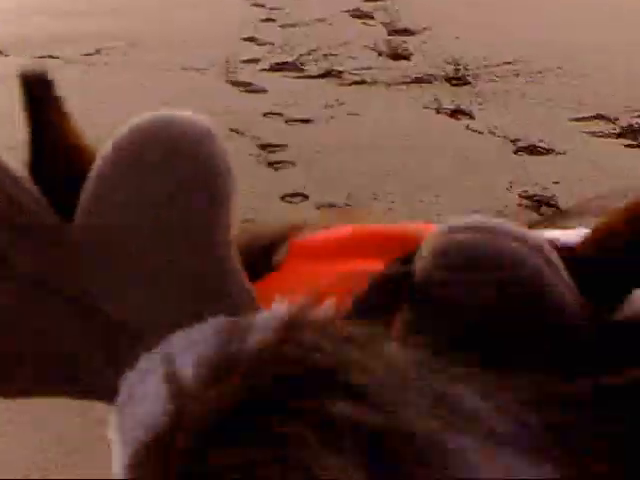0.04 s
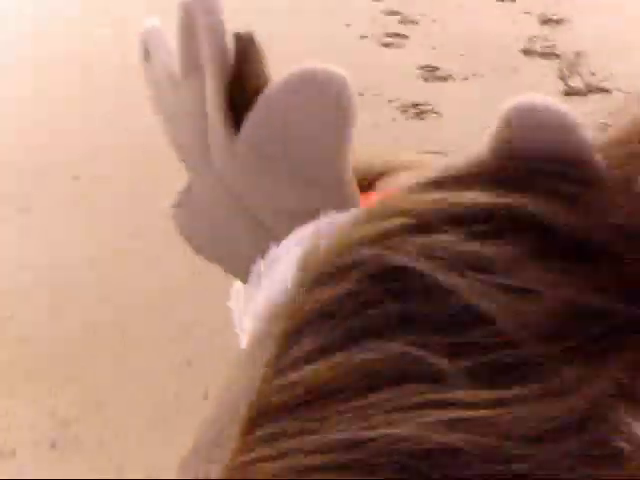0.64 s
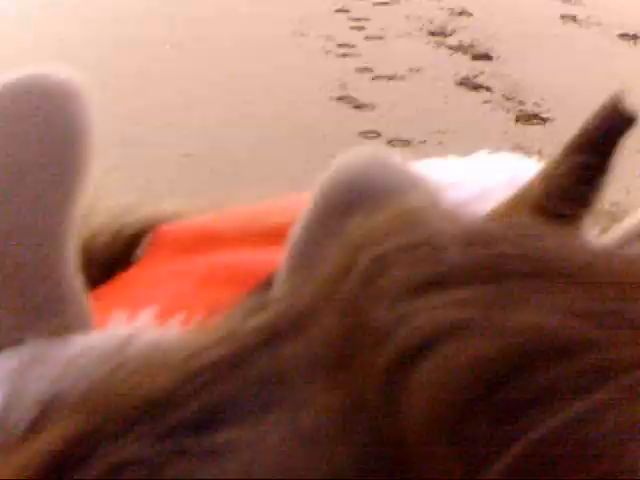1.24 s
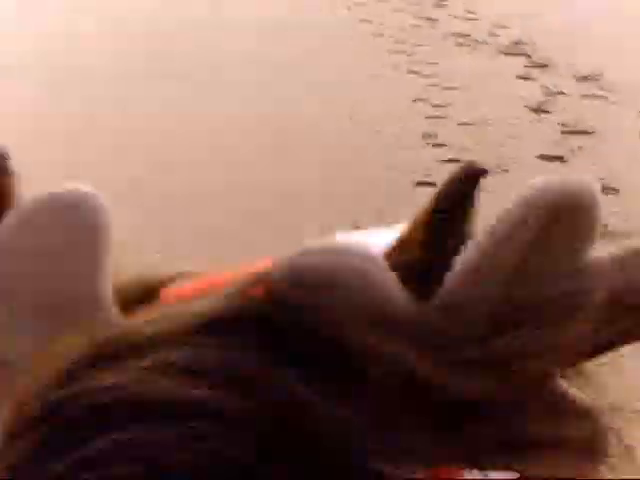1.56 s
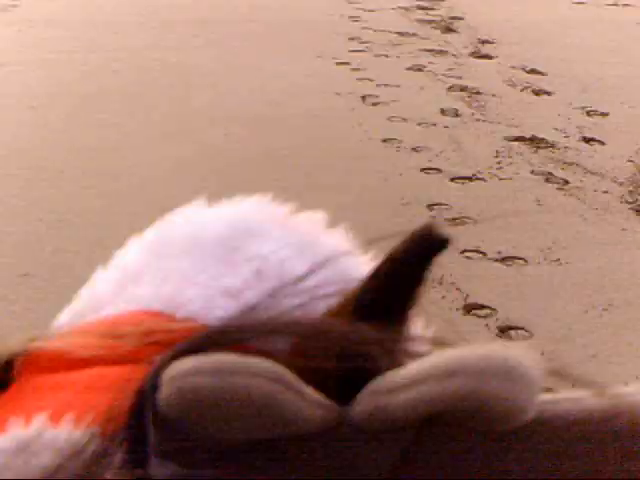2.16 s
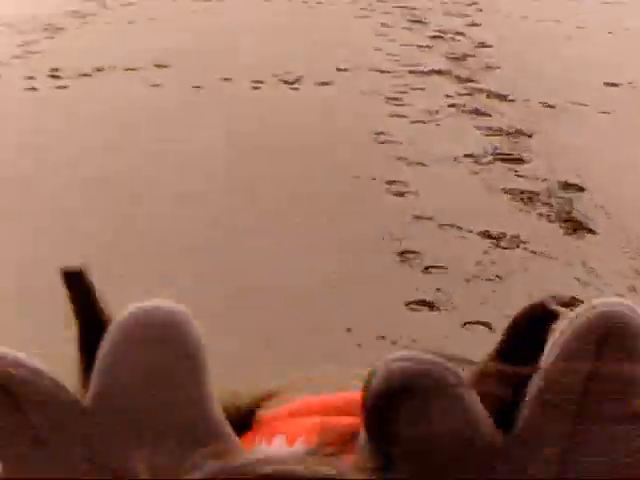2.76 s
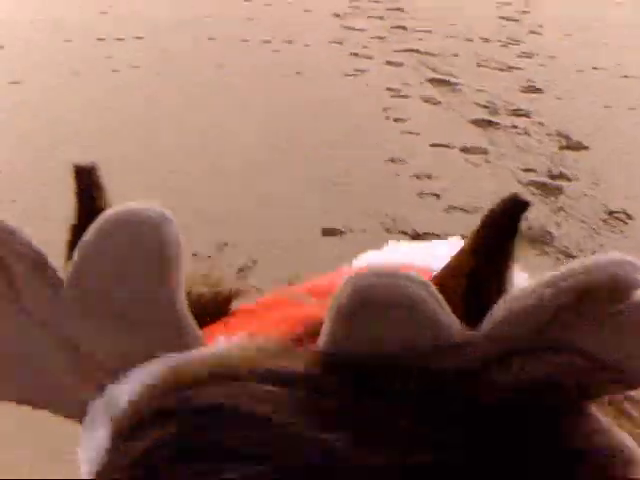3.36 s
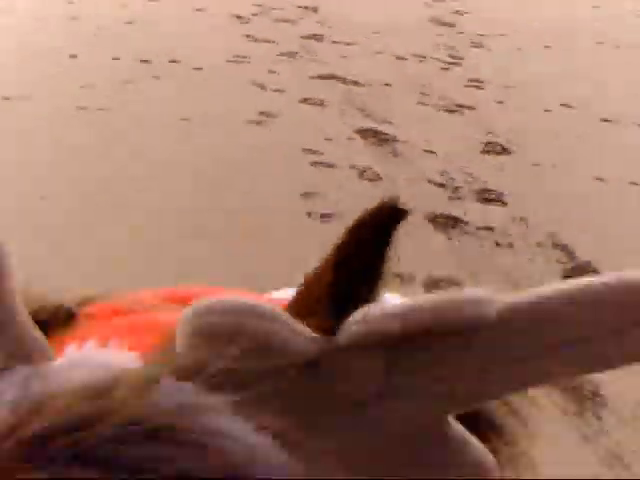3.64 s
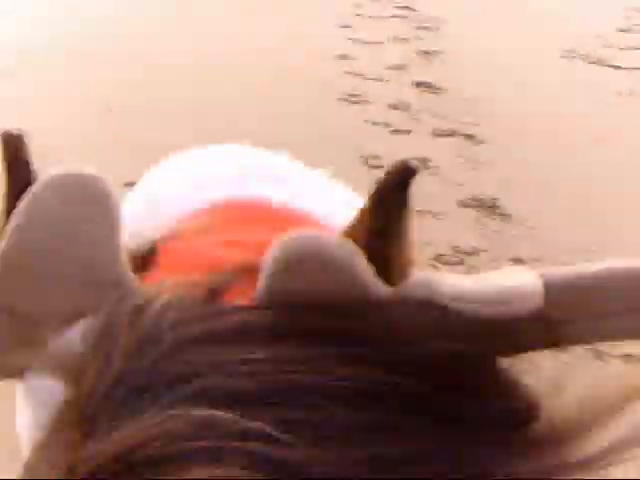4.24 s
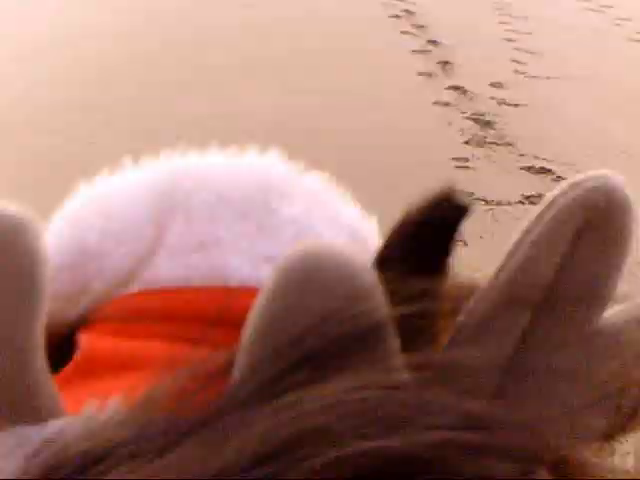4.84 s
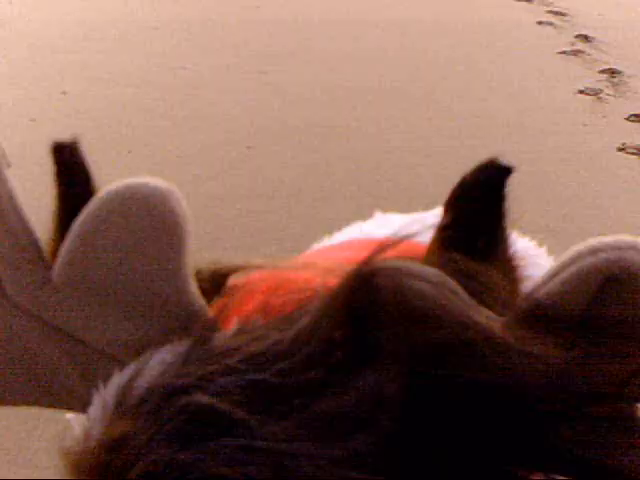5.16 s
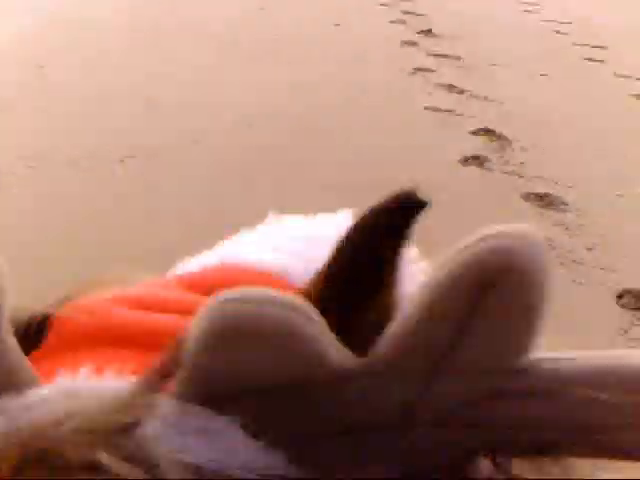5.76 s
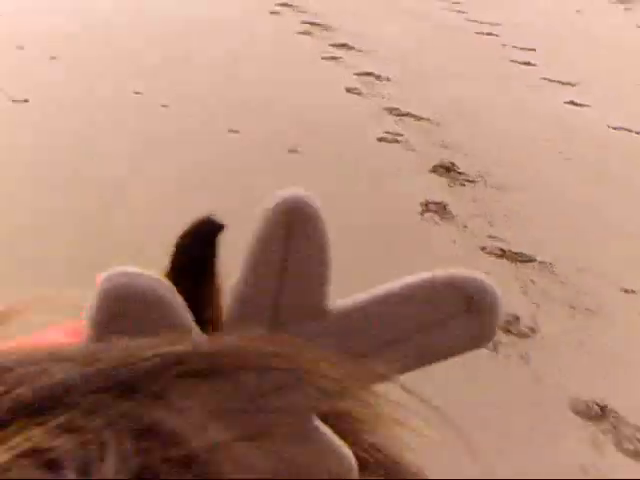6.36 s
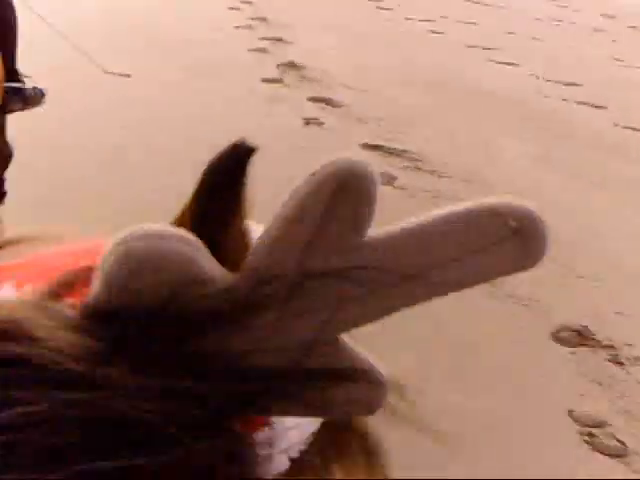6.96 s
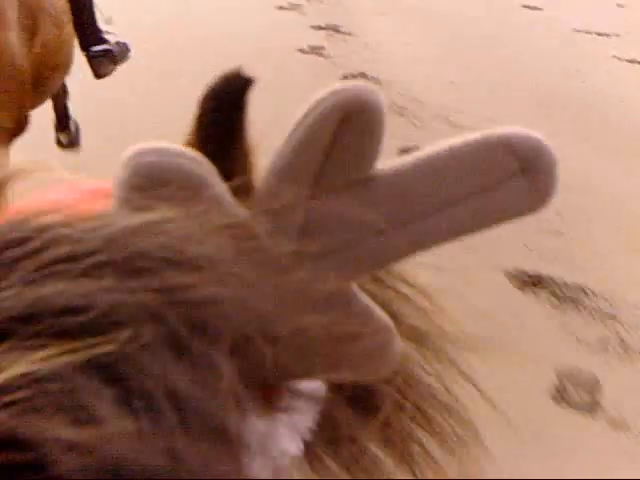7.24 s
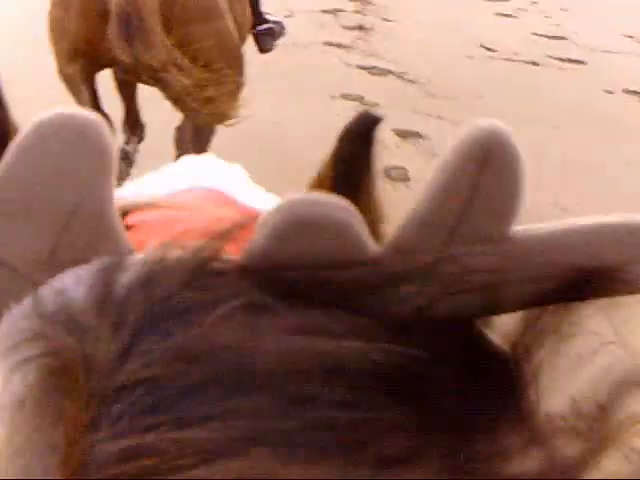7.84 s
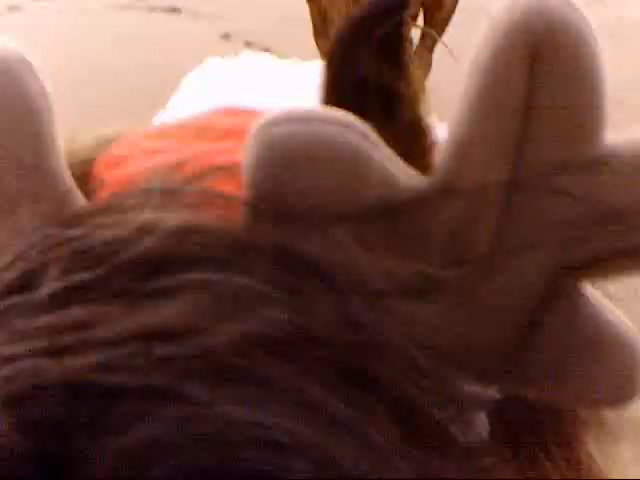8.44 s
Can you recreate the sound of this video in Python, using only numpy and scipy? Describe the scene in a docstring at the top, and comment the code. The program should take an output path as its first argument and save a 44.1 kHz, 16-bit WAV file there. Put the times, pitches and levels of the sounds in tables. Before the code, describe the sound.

Heavy wind buffets the microphone in surges with a horse's stride, almost covering the dull hoofbeats of a beach gallop.

```python
"""Beach gallop on a helmet camera

Wind buffets the camera: eddies of every size roll over the microphone port, surging with the
horse's stride and tearing into short, rasping gusts. Underneath, hooves thud faintly in wet sand,
cloth scuffs, a buckle ticks, and the camera's electronics whine once per picture."""
import sys
import numpy as np
from scipy import signal
from scipy.fft import rfft, irfft, next_fast_len
from scipy.io import wavfile
from scipy.ndimage import uniform_filter1d

SR = 44100
rng = np.random.default_rng(int(sys.argv[2]) if len(sys.argv) > 2 else 0)


def put_to_file(sound):
    """Save the sound as 16-bit audio at rate SR, in the file named by the first command-line argument."""
    columns = np.atleast_2d(sound).T  # one column per channel
    safe = np.clip(columns, -1, 1)
    whole_steps = np.round(safe * 32767)
    wavfile.write(sys.argv[1], SR, whole_steps.astype(np.int16))


N = 379260
TIME = np.arange(N) / SR


# tone of the wind through port and housing: f/Hz, level/dB
PORT_COLOUR = [(8, 9), (25, 0), (55, -5.5), (100, -5.5), (200, -9), (420, -19.5), (700, -24.5),
               (1050, -25.5), (1400, -37), (2300, -36.5), (2800, -52), (3500, -50.5), (4500, -64),
               (9000, -67)]
# slow ride of the deep rumble: t/s, level/dB
RUMBLE_RIDE = [(0.04, 1), (0.24, 0), (1.38, 1), (1.56, -2), (2.05, -4.5), (2.3, -2), (3.43, 1.5),
               (3.98, -2), (4.38, -0.5), (5.11, -1), (6.1, -0.5), (7.19, 0.5), (8.08, -5.5), (8.59, 1.5)]
# eddy sizes, large to small: f/Hz, level/dB, airflow tracking/(dB/dB), rumble tracking/(dB/dB)
EDDY_SIZES = [(40, -2, 0.19, 1.15), (180, -3.5, 0.98, .72), (690, -1.5, 0.9, 0), (1920, -4, 1.35, 0)]

def wind(flow_db, flutter, flutter_db=3.5, puff_db=2.23):
    """The main bed: bands of turbulence ride the nearest eddy sizes, and the small eddies flutter."""
    rumble_db = in_time(RUMBLE_RIDE)[0]
    waver_db = 0.25 * drift(12)
    rides_db = np.array([db + by_flow * flow_db + by_rumble * rumble_db + waver_db
                         for _, db, by_flow, by_rumble in EDDY_SIZES])
    eddy_octaves = np.log2([row[0] for row in EDDY_SIZES])
    size = next_fast_len(N)
    air_spectrum = rfft(from_db(-25.5) * coloured(PORT_COLOUR), size)
    octaves = np.log2(np.arange(size // 2 + 1) * SR / size + 1e-3)
    centres = np.log2([8, 25, 60, 120, 220, 400, 700, 1100, 1700, 2600, 4500])
    out = np.zeros(N)
    for centre, solo in zip(centres, np.eye(len(centres))):
        eddies = irfft(air_spectrum * np.interp(octaves, centres, solo), size)[:N]
        steady = np.std(eddies) * evened(eddies, 0.0426 + 3 / 2 ** centre)
        nearness = np.array([np.interp(centre, eddy_octaves, row) for row in np.eye(len(EDDY_SIZES))])
        smallness = np.clip((centre - np.log2(60)) / 4, 0, 1)
        puffs = rms_one(from_db(flutter_db * smallness * flutter + puff_db * drift(32.5)))
        out += steady * puffs * from_db(nearness @ rides_db)
    return band(out, 1.1, 17000, order=1)


# slow ride of the air over the port: t/s, level/dB
FLOW_RIDE = [(0.0, 0), (0.76, -3), (1.2, 0.5), (1.85, 3), (3.1, 0.5), (3.74, -8.5), (4.82, -5), (5.5, -2.5),
             (6.03, 1), (6.51, -3), (7.34, 0.5), (8.09, -8), (8.6, -4)]
# the head swings into the wind, about once a stride: t/s, boost/dB, length/s
STRIDE_SURGES = [(0.27, 7.5, 0.23), (0.74, 10.5, 0.32), (1.1, 2.5, 0.23), (1.7, 4, 0.1), (1.93, 4.5, 0.036),
                 (2.28, 2.5, 0.1), (2.63, 5, 0.05), (2.95, 2.5, 0.16), (3.46, 4, 0.14), (3.96, 4, 0.3),
                 (4.35, 9.5, 0.12), (4.54, 7, 0.054), (4.94, 5, 0.07), (5.32, 2.5, 0.17), (5.74, 6, 0.31),
                 (6.14, 5.5, 0.12), (6.55, 8, 0.22), (6.86, 5.5, 0.025), (7.35, 4.5, 0.037),
                 (7.54, 4, 0.068), (7.89, 5, 0.059)]
# the port is briefly sheltered: t/s, dip/dB, length/s
LULLS = [(0.47, -3.5, 0.043), (0.98, -4, 0.028), (1.25, -1, 0.042), (1.44, -5.5, 0.064), (3.19, -4, 0.049),
         (3.34, -6.5, 0.051), (3.63, -10.5, 0.037), (4.16, -4.5, 0.17), (4.43, -3, 0.041),
         (4.8, -3.5, 0.053), (5.9, -6.5, 0.052), (5.99, -6, 0.046), (6.34, -11, 0.085), (6.74, -9.5, 0.13),
         (7.21, -12.5, 0.21)]

def airflow():
    """Strength of the air at the port in dB: a slow ride with flat-topped surges and lulls."""
    return in_time(FLOW_RIDE)[0] + swells(STRIDE_SURGES, order=4) + swells(LULLS, order=4)


# sudden tears of wind: t/s, level/dB, length/s
GUSTS = [(0.228, -23.5, 0.039), (0.274, -19.5, 0.024), (0.323, -24, 0.018), (0.39, -17.5, 0.034),
         (0.585, -21, 0.085), (0.815, -18, 0.046), (0.913, -18, 0.018), (0.943, -19.5, 0.015),
         (1.036, -17, 0.012), (1.292, -13.5, 0.038), (1.333, -18, 0.017), (2.236, -23, 0.033),
         (2.686, -16, 0.036), (3.071, -15.5, 0.027), (3.224, -35, 0.033), (3.406, -19.5, 0.02),
         (3.54, -22.5, 0.088), (4.247, -25.5, 0.054), (4.471, -25, 0.023), (4.858, -18, 0.027),
         (4.95, -22, 0.02), (5.295, -19.5, 0.037), (5.839, -19.5, 0.025), (7.317, -23, 0.019),
         (7.542, -15, 0.036)]

def gusts():
    """The flow breaks away for an instant and rasps over the port."""
    rasp = rms_one(band(coloured(PORT_COLOUR), 196, 5500))
    return from_db(-12) * rasp * bursts(GUSTS, rise_s=0.0012)


# heavy thumps of air: t/s, level/dB, length/s
BUFFETS = [(0.123, -23.5, 0.093), (0.167, -33, 0.072), (0.867, -28, 0.056), (1.277, -21, 0.11),
           (1.33, -27, 0.05), (1.841, -19.5, 0.08), (2.217, -22, 0.082), (2.465, -18.5, 0.048),
           (2.643, -24, 0.048), (2.823, -39, 0.033), (2.954, -27, 0.069), (3.072, -24, 0.078),
           (3.212, -24.5, 0.072), (3.533, -27, 0.05), (4.235, -33, 0.056), (4.461, -28.5, 0.059),
           (4.62, -37, 0.15), (4.915, -33, 0.068), (5.713, -27.5, 0.17), (5.918, -23, 0.087),
           (6.026, -36, 0.016), (6.57, -21, 0.046), (7.31, -25, 0.027), (7.881, -28.5, 0.1)]

def buffets():
    """A big eddy hits the housing: a few low, irregular swings of pressure."""
    thump = evened(band(rng.standard_normal(N), 87, 249), 0.015)
    return from_db(-7) * thump * bursts(BUFFETS, rise_s=0.0025)


# sub-bass swells: t/s, level/dB, length/s
HEAVES = [(.15, -30, 0.051), (.27, -24.5, 0.092), (.91, -28, 0.18), (1.07, -26, 0.1), (1.45, -26, 0.093),
          (2.22, -28, .07), (2.46, -28, 0.19), (2.67, -25, 0.095), (2.84, -27, 0.059), (2.96, -28, 0.1),
          (3.21, -27.5, 0.044), (3.44, -31, 0.077), (3.6, -29.5, 0.12), (4.24, -26, 0.057),
          (4.47, -34, .07), (4.64, -28.5, 0.088), (5.35, -29, 0.067), (5.47, -30, 0.084),
          (5.69, -31, 0.061), (5.93, -27, .07), (6.03, -28, 0.065), (6.55, -24, 0.079), (7.16, -30, 0.28),
          (7.54, -31, 0.12), (7.89, -27.5, 0.083), (8.26, -38, 0.16), (8.45, -28, 0.11)]

def heaves():
    """The largest eddies press slowly on the port and let go."""
    sub = evened(band(rng.standard_normal(N), 14, 65), 0.066)
    return from_db(-1) * sub * flares(HEAVES)


# stretches of low, throaty flutter: t/s, level/dB, length/s
THROBS = [(0.16, -32.5, 0.82), (0.93, -28, 0.16), (1.42, -29.5, 0.18), (1.8, -32, 0.19), (2.27, -30.5, .12),
          (4.35, -35.5, .08), (6.82, -34, 0.15), (7.03, -33, 0.13)]

def throb():
    """Air streams across the housing and vortices peel off at a roughly even rate."""
    return flares(THROBS) * evened(band(rng.standard_normal(N), 75, 150), 0.31)


def sputter(flow_db, per_s=170, cycles=5, spread_db=4.5):
    """Tight vortices burst in the port as blips of a few cycles, much harder in a strong flow."""
    onsets = rng.random(N) < per_s / SR
    strength = from_db(-46.5 + 2.07 * flow_db)
    accents = from_db(spread_db * np.minimum(rng.exponential(1, N), 2))
    pushes = onsets * strength * accents * rng.choice([-1, 1], N)
    pitches_hz = np.geomspace(950, 2300, 6)
    pitch_index = rng.integers(0, len(pitches_hz), N)
    blips = sum(ring(pushes * (pitch_index == k), hz, cycles / hz) for k, hz in enumerate(pitches_hz))
    return band(blips, 300, 2090)


# hard clicks of air: t/s, level/dB
SNAPS = [(0.1211, -33.5), (0.324, -40), (0.395, -38), (0.5855, -47), (0.885, -41), (0.913, -33),
         (0.943, -41), (1.0096, -35), (1.286, -26), (1.3, -29), (1.335, -34), (2.008, -37), (2.2363, -29),
         (2.2782, -24), (2.6309, -25), (2.69, -24.5), (2.879, -29), (3.003, -30), (3.225, -35),
         (3.404, -38), (4.313, -46), (5.3504, -34), (5.714, -35), (5.7803, -21), (7.4634, -35)]

def snaps(gain_db=4, corner_hz=1300):
    """The hardest vortices snap on the edge of the port as single pulses."""
    pulses = np.zeros(N)
    for s, db in SNAPS:
        pulses[int(s * SR)] = from_db(db + gain_db) * rng.choice([-1, 1])
    make_up = SR / (np.pi * corner_hz)
    clicks = make_up * band(pulses, 530, corner_hz, order=1)
    return signal.sosfilt(signal.butter(2, 2900, fs=SR, output="sos"), clicks)


# tone of the airy top: f/Hz, level/dB
SWISH_COLOUR = [(3000, 11), (4500, -4), (5500, -2), (6250, 2.5), (6800, -4.5), (9000, -13), (11000, -18),
                (15000, 5)]
# the swish flares up: t/s, level/dB, length/s
SWISH_FLARES = [(1.295, -53, 0.028), (2.48, -55.5, 0.14), (2.56, -72, 0.057), (2.66, -58.5, 0.12),
                (2.95, -58, .04), (4.36, -54.5, .05), (4.92, -63, 0.47), (5.29, -56, 0.098),
                (5.77, -50.5, 0.026), (7.54, -48, 0.018)]

def swish(flow_db, flutter):
    """Air slides along the helmet with a thin, fluttering hiss that grows with the flow."""
    hiss = rms_one(band(coloured(SWISH_COLOUR), 3700, 11000))
    envelope = np.hypot(from_db(-68 + flow_db), flares(SWISH_FLARES))
    return hiss * rms_one(from_db(4 * flutter)) * envelope


# the nearest hoof falls: t/s, level/dB
HOOF_FALLS = [(4.487, -38), (4.633, -39), (5.068, -40.5), (5.341, -40), (7.102, -35), (7.485, -40),
              (7.655, -35), (7.994, -36.5), (8.084, -42), (8.227, -34.5), (8.271, -39.5), (8.366, -47),
              (8.45, -33.5), (8.532, -34)]
# dull knock of a hoof: f/Hz, level/dB, t60/s
HOOF_MODES = [(190, -10, .04), (520, -7, .025), (760, -5, .025), (1080, -4, .022), (2250, -16, .012)]

def hooves(slap_s=0.0064):
    """Near hooves knock and slap on wet sand, among fainter, random steps of other horses."""
    far_steps = rng.uniform([0, -49], [N / SR, -42], (40, 2))   # t/s, level/dB
    knocks = struck(list(HOOF_FALLS) + list(far_steps), HOOF_MODES, contact_s=.005, grit=.1)
    sand = evened(band(rng.standard_normal(N), 280, 770), 0.0072)
    slaps = sand * bursts([(s, db, slap_s) for s, db in HOOF_FALLS], rise_s=0.00079)
    return from_db(0.5) * (band(knocks, 110, 1500) + slaps)


# one tick of the tack: t/s, level/dB
BUCKLE_TICKS = [(7.5818, -29.5)]
# bright ring of the buckle: f/Hz, level/dB, t60/s
BUCKLE_MODES = [(6400, 10, 0.0079), (6970, -2, 0.0052), (9440, -3, 0.0075), (12500, -5, 0.0085),
                (15200, -10, .004)]

def buckle(crack_s=0.0039):
    """A buckle ticks: a bright crack and a very short ring."""
    ringing = band(struck(BUCKLE_TICKS, BUCKLE_MODES, contact_s=0.0013, grit=0.23), 6000, 18000)
    fizz = rms_one(band(rng.standard_normal(N), 6000, 21000))
    crack = fizz * bursts([(s, db, crack_s) for s, db in BUCKLE_TICKS], rise_s=0.00092)
    return from_db(-12) * ringing + from_db(-14) * crack


# short brushes of clothing or mane: t/s, level/dB, length/s
SCUFFS = [(3.405, -51, .02), (3.428, -61, 0.014), (3.465, -60, .016), (3.542, -57, .012), (4.247, -55, .02),
          (4.365, -68, 0.026), (6.03, -57, .025), (6.865, -59, .02), (7.552, -45.5, 0.012),
          (7.88, -60, .025)]

def scuffs(flutter):
    """Cloth and hair brush past with a dry, grainy hiss."""
    grain = band(rng.standard_normal(N), 1800, 5600) * from_db(6 * flutter)
    return rms_one(grain) * bursts(SCUFFS, rise_s=0.0044)


# path of a faint, breathy whistle: t/s, f/Hz, level/dB
WHISTLE_PATH = [(1.45, 2350, -78), (1.53, 2480, -62), (1.65, 2400, -72), (1.85, 2350, -73),
                (1.97, 2450, -58), (2.1, 2330, -61), (2.2, 2300, -80)]

def whistle(width_hz=70):
    """Air sings on an edge of the helmet: narrow noise around a wandering tone."""
    hz, db = in_time(WHISTLE_PATH)
    phase = 2 * np.pi * np.cumsum(hz) / SR
    return from_db(db) * (drift(width_hz) * np.cos(phase) + drift(width_hz) * np.sin(phase))


# partials of the whine: f/Hz, level/dB
WHINE_TONES = [(7000, 0), (15050, -6.5)]
# slow ride of the whine: t/s, level/dB
WHINE_RIDE = [(0, -64.5), (1.05, -58), (1.4, -63.5), (2.3, -60), (3.35, -69), (3.58, -64), (3.68, -70.5),
              (5.4, -64.5), (6.3, -68), (7.05, -65.5), (7.35, -62.5), (8.6, -63)]
# pulse shape over one picture: position/period, level/dB
PULSE_SHAPE = [(0, -11), (.03, -11), (.11, 1.5), (.2, 3), (.45, 1.5), (.65, -2), (.86, -5), (.92, -4),
               (1, -11)]
# how deeply it pulses: t/s, depth/factor
PULSE_DEPTH = [(0, 0.93), (2.5, 0.65), (3.7, 0.86), (5, 1.4), (6.8, .9), (7.4, 1.4), (8.6, 1.4)]

def whine(picture_s=.0375):
    """Two high, rough tones pulse with each picture read from the sensor."""
    shape_db = np.interp(TIME / picture_s % 1, *np.transpose(PULSE_SHAPE))
    jitter = 1 + .36 * (drift(130) + 1j * drift(130))   # roughens both level and phase
    pulse = from_db(shape_db * in_time(PULSE_DEPTH)[0] + 2 * drift(36)) * jitter
    phase = np.angle(pulse) + 1.1 * drift(25)
    envelope = np.sqrt(2) * evened(np.abs(pulse), 8 * picture_s) * from_db(in_time(WHINE_RIDE)[0])
    return envelope * sum(from_db(db) * np.cos(2 * np.pi * hz * TIME + phase) for hz, db in WHINE_TONES)


# faint steady tones: f/Hz, level/dB
CIRCUIT_TONES = [(4805, -81), (9610, -92)]
# tone of the hiss: f/Hz, level/dB
HISS_COLOUR = [(1900, 0), (2350, 5), (2800, -3), (4000, -4.5), (8000, -6), (9600, -6), (11000, -10.5),
               (12500, -8.5), (15500, -8.5)]

def noise_floor():
    """The preamplifier hisses and the circuit adds its steady tones."""
    tones = sum(from_db(db) * np.sin(2 * np.pi * hz * TIME) for hz, db in CIRCUIT_TONES)
    return np.sqrt(2) * tones + from_db(-63.3) * coloured(HISS_COLOUR)


def from_db(db):
    """Decibels to gain."""
    return 10 ** (np.asarray(db) / 20)


def rms_one(x):
    """Scale to unit rms."""
    return x / np.sqrt(np.mean(x ** 2) + 1e-20)


def in_time(rows):
    """One value per sample for each column after the time."""
    times, *columns = np.transpose(rows)
    return [np.interp(TIME, times, column) for column in columns]


def band(x, low_hz, high_hz, order=2):
    """Butterworth band-pass."""
    sos = signal.butter(order, [low_hz, min(high_hz, .45 * SR)], "band", fs=SR, output="sos")
    return signal.sosfilt(sos, x + 1e-18)


def drift(rate_hz):
    """Smooth random modulation at about this rate; rms 1."""
    pole = np.exp(-20 * np.pi * rate_hz / SR)   # runs at a tenth of the sample rate
    slow = signal.lfilter([1], [1, -2 * pole, pole * pole], rng.standard_normal(N // 10 + 4002))[4000:]
    return np.interp(np.arange(N) / 10, np.arange(len(slow)), rms_one(slow))


def kicks(per_s, decay_s):
    """Random jolts that start at once and die away; mean 0, rms 1."""
    onsets = rng.random(N) < per_s / SR
    jolts = signal.lfilter([1], [1, -np.exp(-1 / (decay_s * SR))], onsets + 1e-18)
    return rms_one(jolts - jolts.mean())


def coloured(colour):
    """Noise through an EQ curve of (f/Hz, level/dB) points; rms 1."""
    size = next_fast_len(N)
    hz = np.arange(size // 2 + 1) * SR / size
    point_hz, point_db = np.transpose(colour)
    eq = from_db(np.interp(np.log(hz + 1e-3), np.log(point_hz), point_db))
    return rms_one(irfft(rfft(rng.standard_normal(size)) * eq, size)[:N])


def evened(x, span_s):
    """Level out swells slower than the span; rms about 1."""
    power = uniform_filter1d(x * x, max(int(span_s * SR), 2))
    return x / np.sqrt(np.abs(power) + 1e-20)


def bursts(rows, rise_s):
    """Envelope of (t/s, level/dB, length/s) hits: quick attack, smooth release."""
    out = np.zeros(N)
    for s, db, length in rows:
        start = max(int((s - rise_s) * SR), 0)
        span = slice(start, start + SR // 4)
        age = TIME[span] - s
        out[span] += from_db(db) * np.clip(1 + age / rise_s, 0, 1) * np.exp(-(2 * age / length) ** 2)
    return out


def swells(rows, order):
    """Sum of (t/s, height, length/s) humps; order 2 is a bell, order 4 has a flat top."""
    return sum(height * np.exp(-np.minimum(np.abs(2 * (TIME - s) / length), 6) ** order)
               for s, height, length in rows)


def flares(rows):
    """Envelope of (t/s, level/dB, length/s) sounds that fade in and out."""
    return swells([(s, from_db(db), length) for s, db, length in rows], order=2)


def ring(force, hz, t60):
    """A unit push sets a sine of height 1 ringing."""
    decay, angle = 1000 ** (-1 / (t60 * SR)), 2 * np.pi * hz / SR
    return signal.lfilter([0, np.sin(angle)], [1, -2 * decay * np.cos(angle), decay ** 2], force + 1e-18)


def struck(rows, modes, contact_s, grit):
    """Each blow is a push with a gritty tail that sets the modes ringing."""
    force, size = np.zeros(N + SR), SR // 10
    for s, db in rows:
        blow = grit * rng.standard_normal(size) * np.exp(-TIME[:size] / contact_s)
        blow[0] = 1
        start = int(s * SR)
        force[start:start + size] += from_db(db) * blow / np.sqrt(np.sum(blow ** 2))
    return sum(from_db(db) * ring(force[:N], hz, t60) for hz, db, t60 in modes)


def scene():
    """The mono mix: wind up front, horse and electronics behind."""
    flow_db = airflow()
    puffs = rms_one(drift(247) + 0.63 * kicks(per_s=51, decay_s=0.0041))   # shared by all small eddies
    flutter = np.minimum(puffs, 2)   # a puff can only be so strong
    rush = wind(flow_db, flutter) + gusts() + sputter(flow_db) + snaps()
    air = whistle() + swish(flow_db, flutter)
    rumble = buffets() + heaves() + throb()
    horse = scuffs(flutter) + hooves() + buckle()
    return (rush + air + rumble + horse + whine() + noise_floor())[None]


def record(dry, cutoff_hz=15800):
    """A steep low-pass takes off the very top."""
    return signal.sosfilt(signal.ellip(10, .2, 70, cutoff_hz, fs=SR, output="sos"), dry)


dry = scene()
out = record(dry)
put_to_file(out)
```